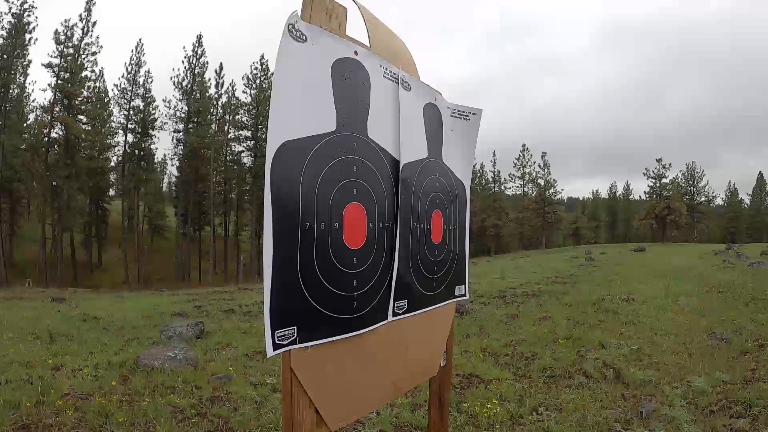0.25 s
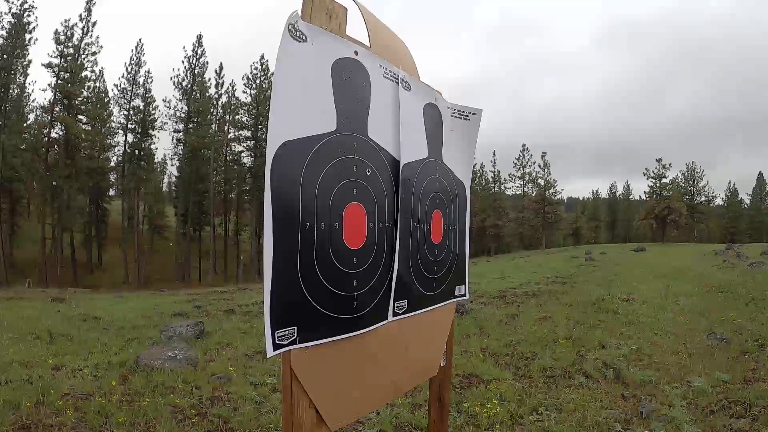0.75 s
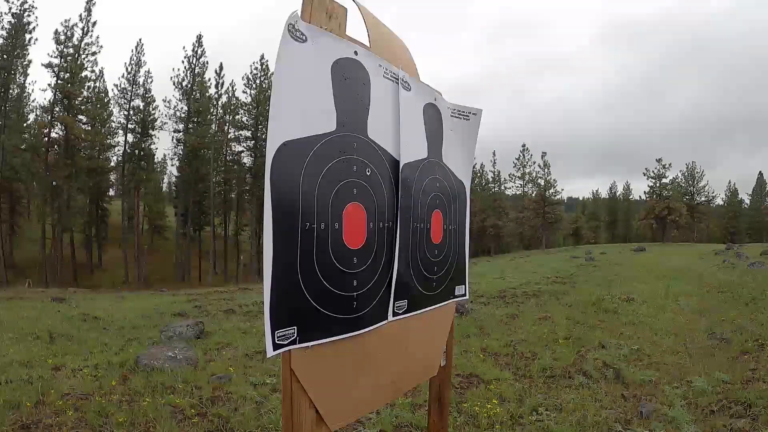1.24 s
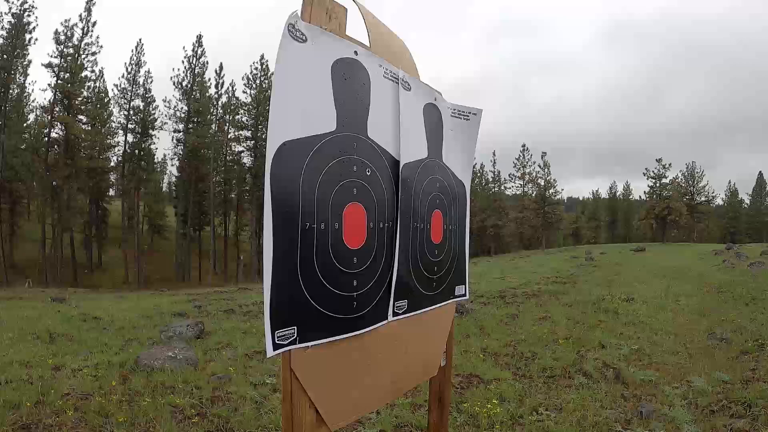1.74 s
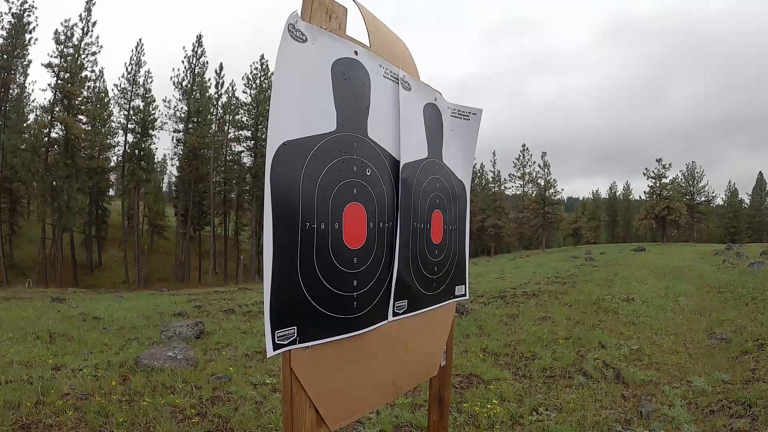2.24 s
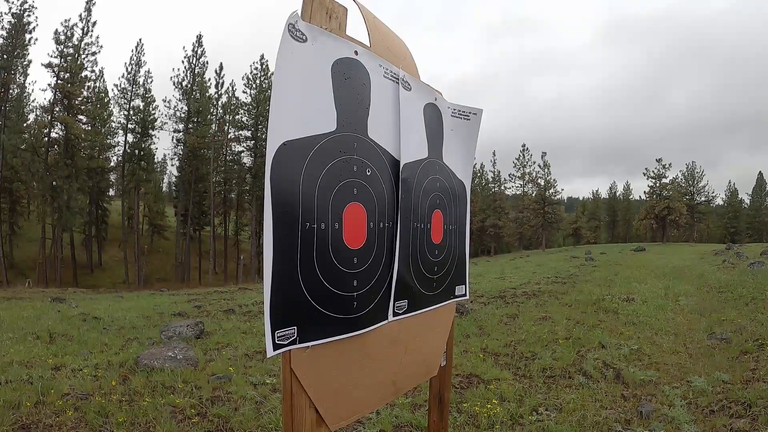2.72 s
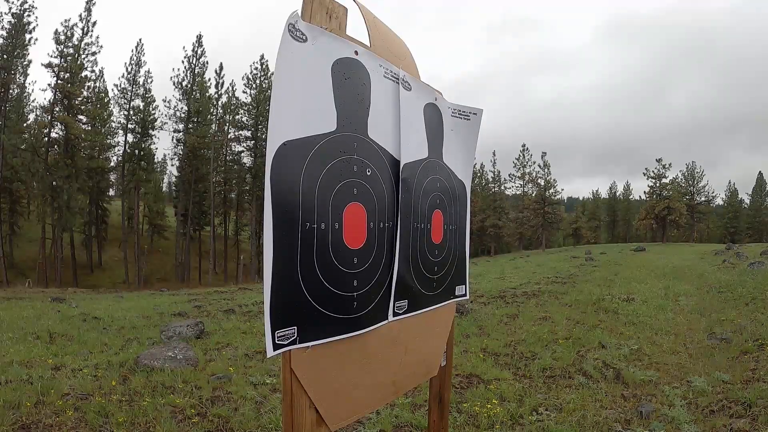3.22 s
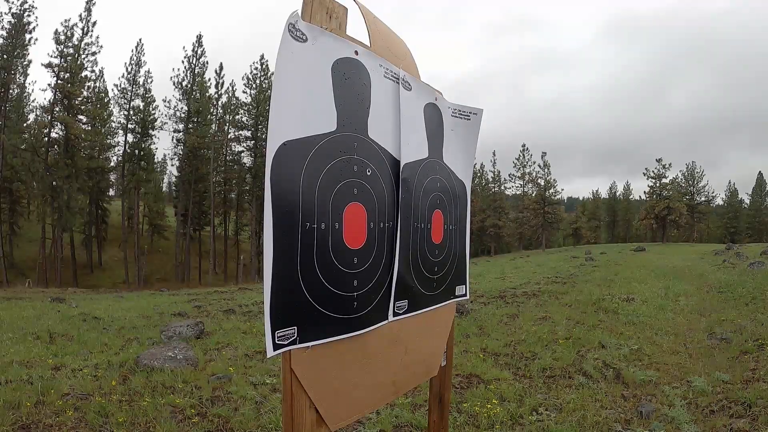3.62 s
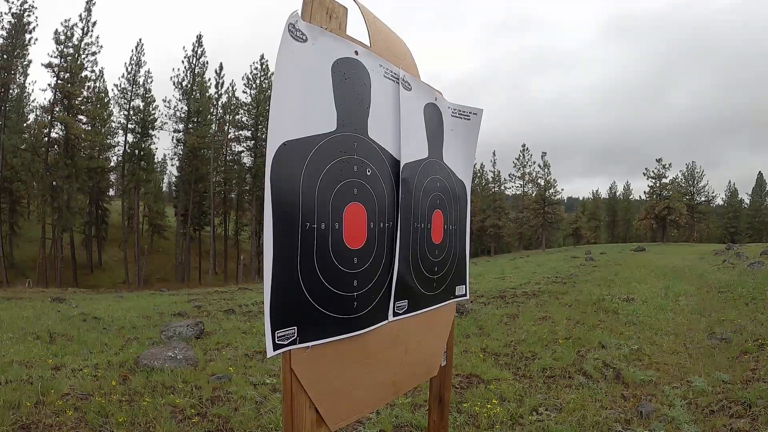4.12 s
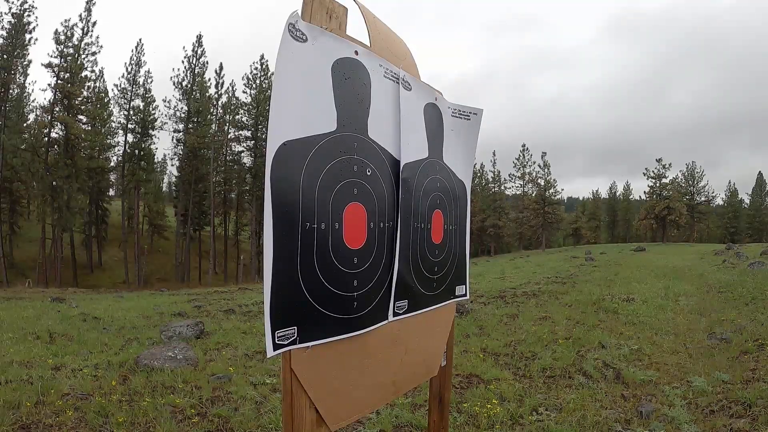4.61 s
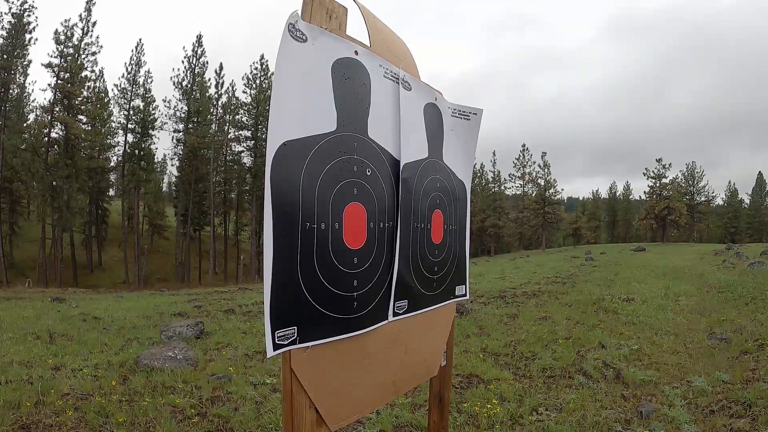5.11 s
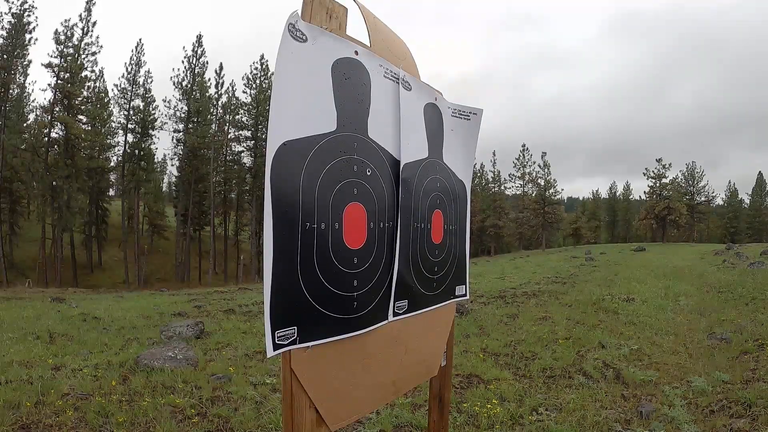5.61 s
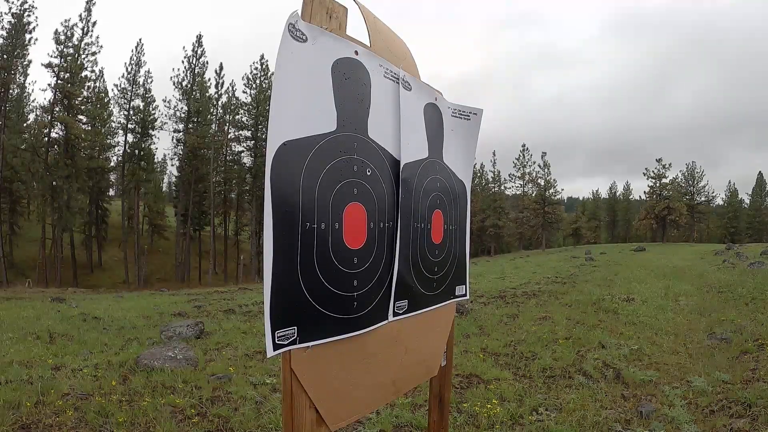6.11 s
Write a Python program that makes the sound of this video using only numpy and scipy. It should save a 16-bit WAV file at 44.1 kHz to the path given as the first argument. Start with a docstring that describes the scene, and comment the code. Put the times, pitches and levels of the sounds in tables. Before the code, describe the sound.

One loud rifle crack and dull muzzle thump, clattering echoes from trees and slopes, then quiet meadow air with small birds and a far engine.

```python
"""A rifle shot heard beside a cardboard target in a forest meadow.
From the start: filtered-noise wind, a far engine (pulses ringing a pipe) and small whistling birds (gliding sines).
At half a second a quick series of N-wave shock cracks shakes the board, then the dull muzzle thump follows;
echoes (filtered clicks) roll back from ever more distant trees and slopes while the background dips and recovers.
Later come more bird notes, rough chips and nasal calls with overtones; last, a faint two-tone drone glides down."""
import sys
import numpy as np
from scipy import signal
from scipy.fft import rfft, irfft, next_fast_len
from scipy.io import wavfile
from scipy.ndimage import uniform_filter1d

SR = 44100
rng = np.random.default_rng(int(sys.argv[2]) if len(sys.argv) > 2 else 0)


def dump(signal):
    """Clip the signal to [-1, 1] and save it as 16-bit WAV at the path in sys.argv[1]."""
    limited = np.clip(np.atleast_2d(signal).T, -1, 1)
    pcm = np.round(limited * 32767).astype(np.int16)
    wavfile.write(sys.argv[1], SR, pcm)


N = 280035
THUMP_S = 0.6017  # centre of the muzzle thump


def undb(db):
    """Amplitude gain is ten to the power of level [dB] over 20."""
    return 10 ** (np.asarray(db) / 20)


def unit(x):
    """Normalisation of mean power: scale to rms 1."""
    return x / np.sqrt(np.mean(x ** 2))


def curves(table):
    """Linear interpolation in time: columns of a table on the sample grid."""
    s, *columns = np.transpose(table)
    return [np.interp(np.arange(N) / SR, s, c) for c in columns]


def colour(table, hz):
    """Spectral envelope: level [dB] at hz, interpolated over log frequency."""
    table = np.array(table)
    return np.interp(np.log(hz), np.log(table[:, 0]), table[:, 1])


def band(x, hz, width):
    """Gaussian pass band without phase shift: gain 1 at the centre, steep skirts."""
    size = next_fast_len(x.shape[-1])
    f = np.fft.rfftfreq(size, 1 / SR)
    gain = np.exp(-((f - hz) / width) ** 2 / 2)
    return irfft(rfft(x, size) * gain, size)[..., :x.shape[-1]]


def pan(x, db):
    """Interaural level difference: left stands db above right."""
    return x * undb(np.array([db, -db]).reshape(2, -1) / 2)


def add(out, s, x):
    """Superposition: mix x into out from time s."""
    i = int(s * SR)
    out[:, i:i + x.shape[1]] += x[:, :out.shape[1] - i]


def walk(rate):
    """Random modulation: levels held 1 / rate s and slewed, spread near 1."""
    k = int(SR / rate)
    held = np.repeat(rng.standard_normal(N // k + 1), k)
    return uniform_filter1d(held, k)[:N] * 0.74


def pair(spark_db, like):
    """Partial coherence: two partly alike noises; spark_db makes single samples stand out."""
    a, b = rng.standard_normal((2, N)) * undb(spark_db * rng.exponential(size=N))
    like = np.clip(like, 0, 1)
    return unit(np.sqrt(1 + like) * a + np.sqrt(1 - like) * b * np.array([[1], [-1]]))


DIP_DEEPEST_S, DIP_BACK_S = 1.6, 0.99  # time of the deepest point; time constant of the return


def dip():
    """Exponential recovery: 0 until the thump, 1 at the deepest, then easing back."""
    t = np.arange(N) / SR
    fall = np.clip((t - THUMP_S) / (DIP_DEEPEST_S - THUMP_S), 0, 1)
    return fall * np.exp(-np.maximum(t - DIP_DEEPEST_S, 0) / DIP_BACK_S)


# spectral density of the wind: (frequency [Hz], level [dB per Hz], relative)
AIR_SPECTRUM = [(25, -13.5), (60, -15), (156, -5), (410, -15.5), (850, -24.5), (1110, -20), (1400, -17),
                (2060, -20), (2900, -28.5), (7100, -41), (9500, -56.5), (12200, -56.5), (15500, -53)]
# level of a high hiss: (time [s], level [dB])
HISS_LEVEL = [(0, -66), (.2, -71.5), (.55, -74.5), (1.5, -85.5), (5.2, -95.5), (5.7, -73), (6.35, -78.5)]
AIR_DB, AIR_DIP_DB = -63.5, -10.5  # level of the bands above 220 Hz; change at the deepest dip


def air():
    """Broadband noise of distant wind in the trees: narrow bands swell together and flicker alone."""
    swell, bands, noise = walk(0.99), [], pair(0, 0.13)
    for hz in 28 * 2 ** np.arange(0, 9.3, 1 / 3):
        band_db = colour(AIR_SPECTRUM, hz) + 10 * np.log10(hz)  # density to band level
        flicker_db = 1.2 * swell + 2.2 * walk(6.4)
        bands.append(undb(band_db + flicker_db) * unit(band(noise, hz, hz / 8)))
    wind = sum(bands) / np.sqrt(np.mean(sum(bands[9:]) ** 2))
    hiss_db = curves(HISS_LEVEL)[0] + 1.5 * walk(15)
    hiss = undb(hiss_db) * unit(band(pair(0, 0.48), 4500, 1600))
    return undb(AIR_DB + AIR_DIP_DB * dip()) * wind + hiss


# resonances of the exhaust pipe: (frequency [Hz], width [Hz], level [dB])
PIPE_RESONANCES = [(36, 7.6, -6.5), (65.6, 14, 4.5), (107, 6.7, -7), (144, 32, 0), (233, 31, -16)]
ENGINE_HZ, ENGINE_DB, ENGINE_DIP_DB = 36.7, -59, -17  # firing rate; level; change at the deepest dip
ENGINE_SWELL_DB, ENGINE_SWELL_S = 3.5, 4.6  # grows by the swell from that time to the end


def engine():
    """Pulse-excited resonance: slightly uneven firings ring the exhaust pipe."""
    t = np.arange(N) / SR
    swell = np.clip((t - ENGINE_SWELL_S) / (t[-1] - ENGINE_SWELL_S), 0, 1)
    level_db = ENGINE_DB + ENGINE_SWELL_DB * swell + ENGINE_DIP_DB * dip()
    rate_hz = ENGINE_HZ * (1 + 0.0088 * walk(27) + 0.0042 * walk(2.4))
    firings = np.diff(np.floor(np.cumsum(rate_hz) / SR), prepend=0)
    strength_db = 1.7 * rng.standard_normal((2, N)) + 2.6 * rng.standard_normal(N)
    pulses = firings * undb(strength_db)
    rung = sum(undb(db) * band(pulses, hz, width) for hz, width, db in PIPE_RESONANCES)
    return unit(rung) * undb(level_db)


def birds():
    """Convolution reverberation: all the calls, with a short decaying noise tail from the trees."""
    calls = glides() + whistles() + repeated_notes() + chips() + arched_calls()
    t = np.arange(SR // 4) / SR
    tail = unit(rng.standard_normal((2, len(t))) * np.exp(-t / .045)) / np.sqrt(len(t))
    return calls + undb(-4) * signal.fftconvolve(calls, tail, axes=1)[:, :N]


def note(length, hz0, hz1, hz2, rasp):
    """Frequency modulation: a sine curves through three pitches; rasp shakes pitch and level."""
    u = np.linspace(0, 1, int(length * SR))
    hz = hz0 * (1 - u) * (1 - 2 * u) + 4 * hz1 * u * (1 - u) + hz2 * u * (2 * u - 1)
    shake = unit(band(rng.standard_normal((2, SR // 2)), 150, 250))[:, :len(u)]
    rasp = np.clip(rasp, 0, 1)
    phase = 2 * np.pi * np.cumsum(hz * (1 + .04 * rasp * shake[0])) / SR
    tone = np.sin(phase) * (1 + rasp * shake[1])
    return tone * signal.windows.tukey(len(u), .5)


# gliding notes:
# (time [s], length [s], start frequency [Hz], middle frequency [Hz], end frequency [Hz], level [dB])
GLIDE_NOTES = [(0.018, .058, 4500, 4940, 4000, -59.5), (1.925, 0.031, 6270, 5800, 5450, -60.5),
               (1.941, .052, 5270, 5250, 4470, -58), (1.953, 0.023, 6800, 6980, 7150, -74),
               (2.0, .028, 7600, 5750, 5000, -65), (2.012, 0.051, 4770, 4270, 3770, -59.5),
               (2.299, .053, 5750, 5060, 4100, -77), (2.898, 0.027, 3520, 5740, 6860, -68),
               (2.915, 0.059, 4600, 4890, 4190, -63.5), (2.965, .069, 6850, 5000, 3870, -70),
               (3.775, 0.17, 5630, 7050, 7140, -76), (3.928, 0.022, 6990, 5330, 2800, -69),
               (4.865, 0.035, 4670, 5190, 5760, -64.5), (4.89, 0.063, 5280, 4830, 4270, -59.5),
               (4.956, 0.023, 2970, 3380, 2800, -59.5), (4.965, .061, 6340, 4630, 3530, -68),
               (5.044, 0.063, 3430, 2820, 2490, -72), (6.203, 0.056, 4600, 4970, 4370, -69.5),
               (6.274, 0.025, 3550, 2800, 2460, -62.5), (6.278, 0.066, 5640, 4180, 3500, -70)]
RISE_RASP, FALL_RASP = .5, .12  # rising notes are rough, falling ones clear


def glides():
    """Continuous pitch change: short notes glide between frequencies."""
    out = np.zeros((2, N))
    for s, length, hz0, hz1, hz2, db in GLIDE_NOTES:
        rasp = RISE_RASP if hz2 > hz0 else FALL_RASP
        add(out, s, pan(undb(db) * note(length, hz0, hz1, hz2, rasp), 0.87))
    return out


# level whistles: (time [s], length [s], frequency [Hz], level [dB], rasp [0-1])
WHISTLE_NOTES = [(0.055, .11, 3780, -63.5, 0.94), (.2, 0.2, 3940, -59.5, 0.64),
                 (.35, .12, 4060, -61.5, 0.9), (.45, 0.11, 3760, -65, 0.6), (.215, 0.083, 2320, -71.5, 0.1),
                 (4.479, 0.054, 2274, -62.5, 0.15), (4.622, 0.081, 3310, -74, 0.2),
                 (4.739, 0.061, 2500, -71, 0.27), (5.2, 0.21, 2640, -76.5, 0.53),
                 (5.272, 0.026, 2800, -73, .5), (5.77, 0.054, 2550, -64, 0.6),
                 (6.05, 0.052, 3410, -68, .05), (6.287, 0.074, 2390, -56.5, 0.15)]


def whistles():
    """Near-pure tones: the mean pitch stays level, with rasp as random modulation."""
    out = np.zeros((2, N))
    for s, length, hz, db, rasp in WHISTLE_NOTES:
        add(out, s, pan(undb(db) * note(length, hz, hz, hz, rasp), .8))
    return out


# shock cracks of the bullet, levels before the treble limit:
# (time [s], peak level [dB], scatter level [dB], board level [dB], left minus right [dB])
SHOCK_CRACKS = [(0.5282, -46, -28, -46.5, -0.5), (0.539, -19, -20.5, -34, 2),
                (0.5495, 0.5, -7.5, -24.5, 2.5), (0.56, 0, -6.5, -12.5, -0.5),
                (0.5694, -3.5, -1.5, -7.5, 4.5)]
# spectrum scattered by grass and paper: (frequency [Hz], width [Hz], level [dB])
SCATTER_BANDS = [(2340, 2100, -4.5), (4200, 1500, -1.5), (7766, 470, -6.5), (11500, 2500, -17.5)]
# modes of the target board: (frequency [Hz], level [dB], decay by 60 dB [s])
BOARD_MODES = [(47.37, -1.5, 0.044), (156, -3, 0.042), (215, -1, 0.05), (334, -8.5, 0.03)]
CRACK_TOP_HZ, CRACK_BRIGHTENS = 4500, 1.3  # treble limit of the first crack; factor for each later one


def shock_cracks():
    """Ballistic N-waves: each is scattered by grass and paper and excites the board's modes."""
    out, t = np.zeros((2, N)), np.arange(SR // 3) / SR
    for k, (s, peak_db, scatter_db, board_db, pan_db) in enumerate(SHOCK_CRACKS):
        n_wave = np.where((t > 0) & (t < .0004), 1 - 2 * t / 0.00044, 0)
        n_wave = uniform_filter1d(n_wave, size=7, origin=3, mode="constant")
        noise = rng.standard_normal((2, len(t))) + 0.5 * rng.standard_normal(len(t))
        scatter = unit(sum(undb(db) * band(noise, hz, w) for hz, w, db in SCATTER_BANDS))
        # scattered paths pile up, then die
        fade = (0.5 + t / 0.0028) * np.exp(-t / 0.0036) + undb(-16.0) * np.exp(-t / 0.026)
        crack = undb(peak_db) * n_wave + undb(scatter_db) * scatter * fade
        crack = band(crack, 0, CRACK_TOP_HZ * CRACK_BRIGHTENS ** k)
        board = 0
        for hz, db, t60 in BOARD_MODES:
            detune = 1 + .16 * (rng.random((2, 1)) - .5)
            board = board + undb(db) * np.sin(2 * np.pi * hz * detune * t) * undb(-60 * t / t60)
        push = (-1) ** k * undb(board_db)  # the board is pushed and pulled in turn
        add(out, s, pan(crack, pan_db) + pan(push * board, -8.0))
    return out


THUMP_HZ, THUMP_DB, THUMP_WIDTH_S = 185, 0, .0037


def muzzle_thump():
    """Damped pressure pulse: a steep front, one push, a deeper pull and a weak rebound."""
    t = np.arange(N) / SR - THUMP_S
    front = (1 + np.tanh((t + .0034) / .0004)) / 2
    shape = np.exp(-((t + .001) / THUMP_WIDTH_S) ** 2) * front
    return pan(-undb(THUMP_DB) * np.cos(2 * np.pi * THUMP_HZ * t) * shape, .8)


# belts of trees and slopes that return the shot:
# (first return [s], loudest [s], level [dB], fade [dB per s], treble at 4 kHz [dB], low-mid [dB],
#  bass [dB], left minus right [dB])
TREE_BELTS = [(0.56, 0.603, -55.5, 56, 0, 3, 18.5, 2.5), (0.699, 0.75, -37, 38, 0, -3, -2, 2),
              (0.761, 0.937, -32.5, 71, 1, -10.5, -24.5, 4.5), (0.998, 1.001, -41.5, 72, 3, 4.5, -12.5, -1),
              (1.047, 1.334, -41, 20.5, 0.5, -4, -21, 1.5), (2.1, 2.502, -55.5, 35, 4.5, -40, -35.5, -0.5),
              (2.448, 2.906, -47.5, 23, -13.5, -10, -26, -1), (4.302, 4.623, -73, 11.5, 12, -10, -5, -4.5),
              (5.013, 5.772, -73, 7.5, 29, -10, -30.5, -3)]
# spectrum of the rolling echo: (frequency [Hz], level [dB])
ROLL_SPECTRUM = [(40, -25), (70, -16), (150, 2), (300, -1), (550, -5), (850, -0.5), (1200, 5), (2000, 6),
                 (3000, 4.5), (5000, 4.5), (8000, 0), (10000, -14), (14000, -20)]
AIR_LOSS_DB_PER_S = 22  # treble lost at 4 kHz per second after the second belt's first return
CLUMPS_DB, CLUMPS_BLUR_S = 4.5, 1.2  # near returns come in clumps, far ones blur together


def rolling_echoes():
    """Diffuse reflection with air absorption: dense clicks return, longer paths losing more treble."""
    t, step = np.arange(0, N + 64, 32) / SR, np.arange(N) / 32  # gains run on a coarse grid
    columns = np.transpose(TREE_BELTS)[:, :, None]
    first, loudest, level_db, fade_db, treble_db, mid_db, bass_db, pan_db = columns
    rise = np.sin(np.pi / 2 * np.clip((t - first) / (loudest - first), 0, 1))
    swell = rise * undb(level_db - fade_db * np.maximum(t - loudest, 0))
    clicks = pair(2.2, .74)
    clumps_db = CLUMPS_DB * walk(90) * np.exp(-(np.arange(N) / SR - THUMP_S) / CLUMPS_BLUR_S)
    path_loss_db = AIR_LOSS_DB_PER_S * (t - TREE_BELTS[1][0]).clip(0)
    out = 0
    for hz in 45 * 2 ** np.arange(0, 8.5, 1 / 3):
        tilt = np.interp(hz, [150, 500, 1100], [0, 1, 2])  # 0 bass, 1 low-mid, 2 treble
        low_db = max(1 - tilt, 0) * bass_db + (1 - abs(tilt - 1)) * mid_db
        air_db = max((hz - 900) / 3100, 0) ** 1.236 * (treble_db - path_loss_db)
        gain = []
        for side in (1, -1):
            belts = swell * undb(low_db + air_db + side * pan_db / 2)
            power_sum = np.sqrt(np.sum(belts ** 2, axis=0))
            gain.append(np.interp(step, np.arange(len(t)), power_sum))
        roll_db = colour(ROLL_SPECTRUM, hz) + 2.9 * walk(25) + clumps_db
        out = out + np.array(gain) * undb(roll_db) * unit(band(clicks, hz, hz / 8))
    return out


# single trunks and slopes that answer clearly:
# (time [s], peak level [dB], frequency [Hz], left minus right [dB])
TRUNK_SLAPS = [(0.716, -11, 1900, 7.5), (0.727, -10, 2610, 4.5), (0.756, -4, 2230, 4.5),
               (0.823, -4, 1110, 4.5), (0.85, -4, 2820, 5.0), (0.881, -5, 1100, 2.5),
               (0.902, -3, 2600, 4.0), (0.932, -4, 1620, 3.0), (0.961, -6, 1320, 5.0),
               (1.008, -11, 1240, 1.5), (1.092, -6, 1410, -0.5), (1.166, -13, 1020, 0.0),
               (1.236, -15, 1240, 0.5), (1.277, -16, 993, 0.5), (1.329, -16, 1290, 1.5),
               (1.359, -15, 1270, 0.5), (1.406, -17, 1470, 1.5), (1.757, -27, 1290, 0.0),
               (2.457, -31, 1780, -2.0), (2.515, -28, 1200, -1.5), (2.618, -24, 1470, -1.5),
               (2.645, -30, 770, -1.5), (2.71, -26, 1170, -2.0), (2.803, -27, 1040, -1.5)]
SLAP_TAIL_S, SLAP_TAIL_DB = 0.0055, -16.5  # branches behind each trunk add a short crackle


def slaps():
    """Discrete reflection: a brief wavelet returns from each trunk or slope."""
    out = np.zeros((2, N))
    t = np.arange(1200) / SR - .002
    for s, db, hz, side_db in TRUNK_SLAPS:
        click = np.sin(2 * np.pi * hz * t) * np.exp(-(t * hz / 0.91) ** 2)
        crackle = unit(band(rng.standard_normal((2, len(t))), 1.28 * hz, 0.36 * hz))
        crackle = crackle * np.exp(-t / SLAP_TAIL_S) * signal.windows.tukey(len(t), .2)
        add(out, s, pan(undb(db) * (click + undb(SLAP_TAIL_DB) * crackle), side_db))
    return out


# kinds of bird note, each a shape shared by all its notes, then the notes:
# (length [s], start frequency [Hz], middle frequency [Hz], end frequency [Hz], rasp [0-1]),
# (time [s], level [dB])
TICK_NOTES = (0.02, 2600, 4050, 4600, 0.52), [(2.775, -75.5), (3.548, -74), (4.301, -67.5), (4.842, -59.5),
              (5.589, -61), (6.15, -62)]
LOW_HUMP_NOTES = (0.035, 4300, 4070, 3050, 0.33), [(3.125, -74), (3.635, -66), (3.759, -68), (4.933, -58.5),
                  (5.69, -54.5), (5.715, -63.5)]
HIGH_HUMP_NOTES = (.045, 4100, 6300, 4100, 0.62), [(3.635, -69.5), (3.765, -74), (4.934, -62.5),
                   (5.697, -65)]
LOW_CHURR_NOTES = (.075, 2650, 3400, 3380, .8), [(5.495, -63.5), (5.635, -54.5), (5.81, -56)]
HIGH_CHURR_NOTES = (0.048, 2500, 4850, 4400, 0.94), [(5.472, -70), (5.602, -58), (5.772, -65)]


def repeated_notes():
    """Repetition of one pitch contour: ticks, humps and churrs each keep their shape."""
    out = np.zeros((2, N))
    kinds = (TICK_NOTES, LOW_HUMP_NOTES, HIGH_HUMP_NOTES, LOW_CHURR_NOTES, HIGH_CHURR_NOTES)
    for shape, notes in kinds:
        for s, db in notes:
            add(out, s, pan(undb(db) * note(*shape), .8))
    return out


# sharp bird chips: (time [s], level [dB])
CHIP_NOTES = [(3.126, -71), (3.636, -65.5), (3.765, -64), (4.557, -63.5), (4.845, -63.5), (4.935, -57),
              (4.969, -59.5), (5.593, -58), (5.699, -52), (5.725, -57.5), (5.838, -53.5), (6.153, -70)]


def chips():
    """Noisy frequency sweep: three sines rush upward with rough pitch."""
    out = np.zeros((2, N))
    u = np.linspace(0, 1, SR // 75)
    for s, db in CHIP_NOTES:
        sweep = 0
        for hz in (2800, 3900, 5200):
            pitch = hz * (1 + .5 * u + 0.74 * rng.standard_normal(len(u)))
            sweep = sweep + np.sin(2 * np.pi * np.cumsum(pitch) / SR)
        add(out, s, pan(undb(db) * band(sweep, 4800, 2800) * np.sin(np.pi * u), .8))
    return out


# overtones of the nasal call: (multiple of the pitch [1], level [dB])
ARCH_OVERTONES = [(3, 11.5), (4, 9), (5, -13), (6, -9.5), (7, -14.5)]
ARCH_START_HZ, ARCH_TOP_HZ, ARCH_KNEE_HZ, ARCH_END_HZ = 1300, 2130, 1700, 1220
ARCH_RISE_S, ARCH_DROP_S, ARCH_SAG_BEND = .028, .02, .55
ARCH_RISE_DB, ARCH_TOP_DB, ARCH_RISE_SHAKE = -9, -4, .1  # rise faint and shaky, top softer than the sag


def arch(hold_s, sag_s, db):
    """Harmonic synthesis: an overtone stack rises, holds, drops quickly and sags slowly."""
    s = np.cumsum([0, ARCH_RISE_S, hold_s, ARCH_DROP_S, sag_s])
    t = np.arange(0, s[-1], 1 / SR)
    u = np.clip((t - s[3]) / sag_s, 0, 1)
    hz = np.interp(t, s, [ARCH_START_HZ, ARCH_TOP_HZ, ARCH_TOP_HZ, ARCH_KNEE_HZ, ARCH_END_HZ])
    hz = hz - ARCH_SAG_BEND * (ARCH_KNEE_HZ - ARCH_END_HZ) * u * (1 - u)
    shake = np.interp(t, [s[1] / 2, s[1]], [ARCH_RISE_SHAKE, .012]) * walk(350)[:len(t)]
    pitch = uniform_filter1d(hz, size=300) * (1 + shake)
    phase = 2 * np.pi * np.cumsum(pitch) / SR
    tone = 0
    for k, overtone_db in ARCH_OVERTONES:
        throat_db = -6 * (k * pitch / 9500) ** 6  # the throat dulls the top
        tone = tone + undb(overtone_db + throat_db) * np.sin(k * phase)
    level_db = db + np.interp(t, s[:4], [ARCH_RISE_DB, ARCH_TOP_DB, ARCH_TOP_DB, 0])
    return np.sqrt(2) * tone * undb(level_db) * signal.windows.tukey(len(t), .15)


# nasal arched calls: (time [s], hold at the top [s], length of the sag [s], level [dB])
ARCH_CALLS = [(3.19, 0.016, 0.069, -78), (4.564, 0.02, .09, -69), (5.844, 0.0093, 0.07, -67)]


def arched_calls():
    """Harmonic timbre: nasal calls, each one arch of pitch."""
    out = np.zeros((2, N))
    for s, hold_s, sag_s, db in ARCH_CALLS:
        add(out, s, pan(arch(hold_s, sag_s, db), 3.2))
    return out


DRONE_S, DRONE_LENGTH_S, DRONE_EDGE_DB = 4.7, 1.45, -18  # both tones fade in and out by the edge dB
DRONE_FALL_HZ, DRONE_FALL_SHARE = (550, 155), .78  # from, to; part of the length that the fall takes
DRONE_LOW_DB, DRONE_LOW_GROWS_DB = -68, 9  # mid level; starts this much below, ends this much above
DRONE_EDGE_HZ, DRONE_TOP_HZ, DRONE_HIGH_DB = 1300, 1710, -71


def drone():
    """Random frequency modulation: two wavering tones, one falling and one arching."""
    u = np.clip((np.arange(N) / SR - DRONE_S) / DRONE_LENGTH_S, 0, 1)
    edge = (2 * u - 1) ** 2  # 1 at both ends, 0 in the middle
    low_hz = np.interp(u, [0, DRONE_FALL_SHARE], DRONE_FALL_HZ)
    high_hz = DRONE_TOP_HZ + (DRONE_EDGE_HZ - DRONE_TOP_HZ) * edge
    low = np.sin(2 * np.pi * np.cumsum(low_hz * (1 + .045 * walk(45))) / SR)
    high = np.sin(2 * np.pi * np.cumsum(high_hz * (1 + 0.02153 * walk(120))) / SR)
    low_db = DRONE_LOW_DB + DRONE_LOW_GROWS_DB * (2 * u - 1) + 5 * walk(25)
    high_db = DRONE_HIGH_DB + 6.5 * walk(11)
    both = low * undb(low_db) + high * undb(high_db)
    return both * undb(DRONE_EDGE_DB * edge ** 2) * (edge < 1)


def scene():
    """Linear superposition of all sources at the microphones."""
    shot = shock_cracks() + muzzle_thump()
    echoes = rolling_echoes() + slaps()
    return air() + engine() + birds() + shot + echoes + drone()


TOP_HZ = 15800  # upper band limit


def record(dry):
    """Band limiting and soft saturation: left one sample late, bass lost, peaks rounded, top cut."""
    late = [np.roll(dry[0], shift=1), dry[1]]
    x = signal.sosfilt(signal.butter(2, 32, "high", fs=SR, output="sos"), late)
    rounded = x / (1 + x ** 4) ** .25
    return signal.sosfilt(signal.ellip(6, .2, 50, TOP_HZ, fs=SR, output="sos"), rounded)


dry = scene()
out = record(dry)
dump(out)
```